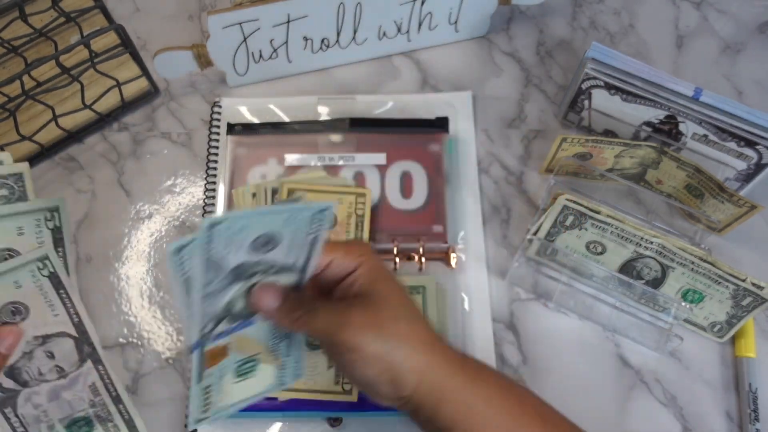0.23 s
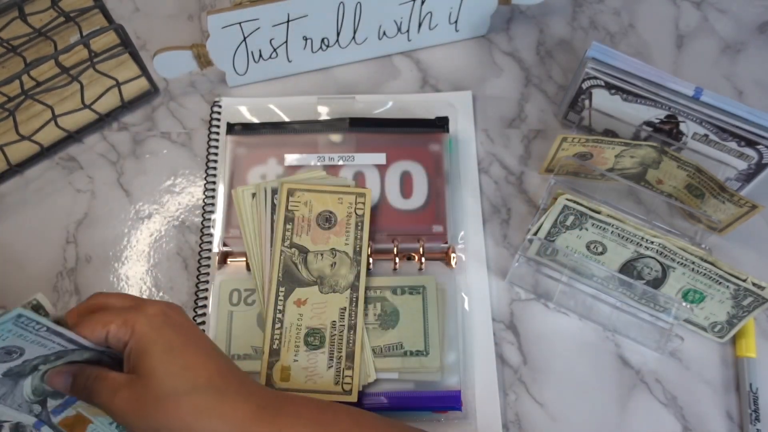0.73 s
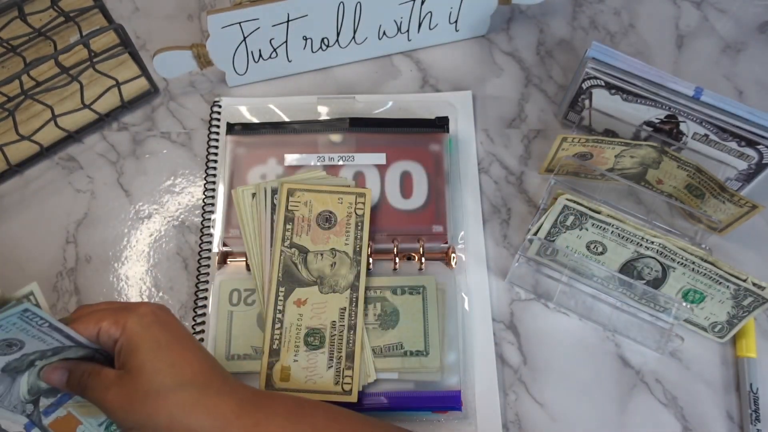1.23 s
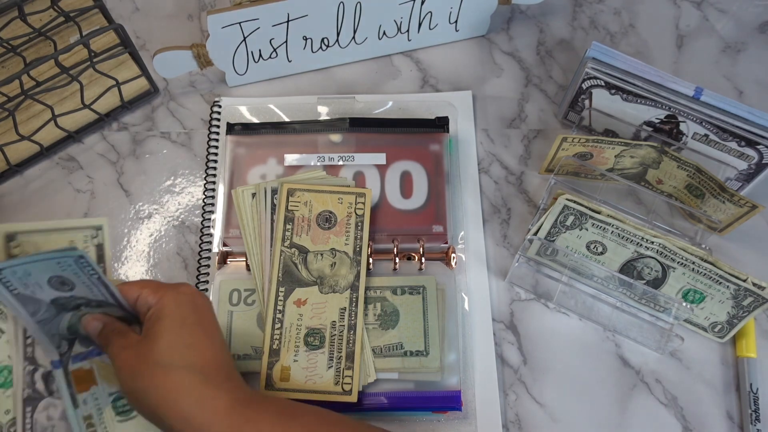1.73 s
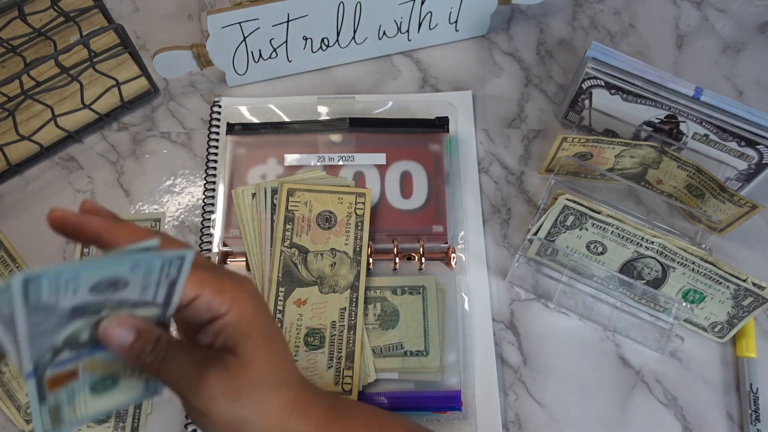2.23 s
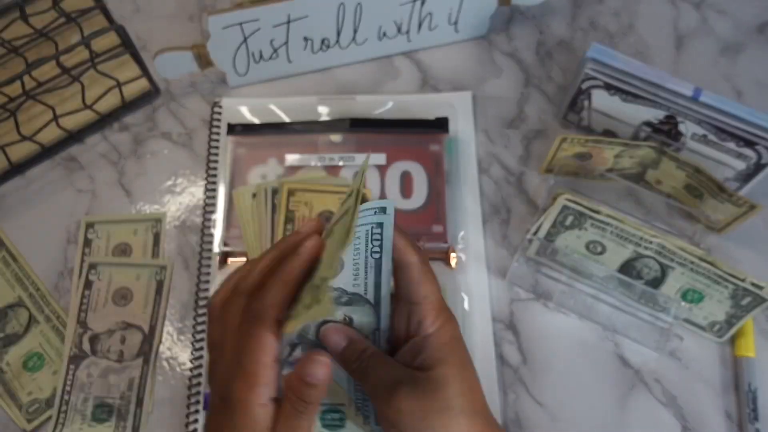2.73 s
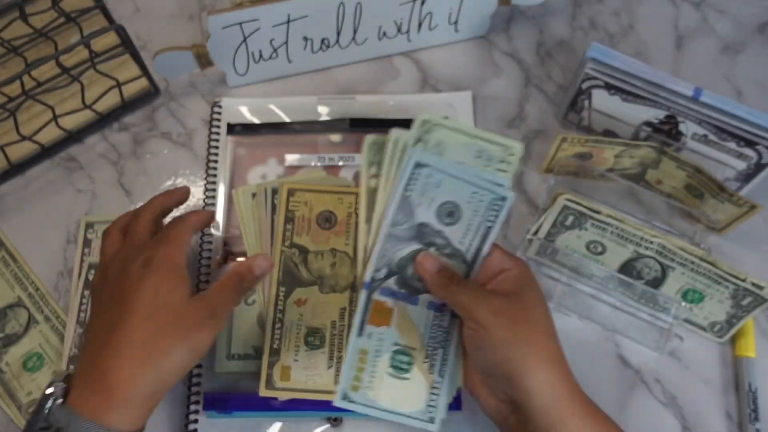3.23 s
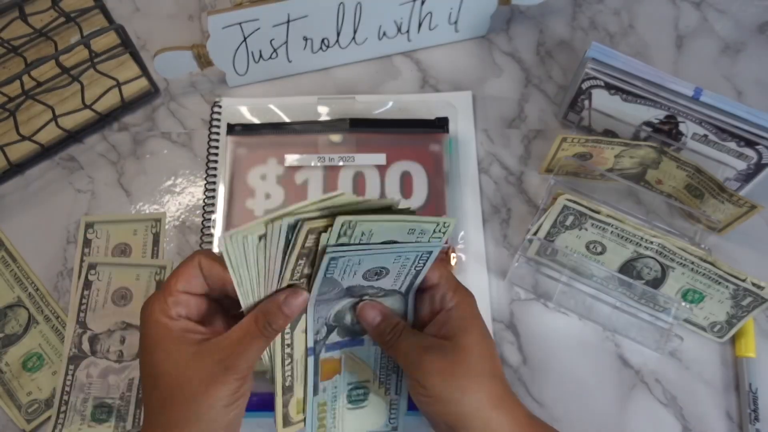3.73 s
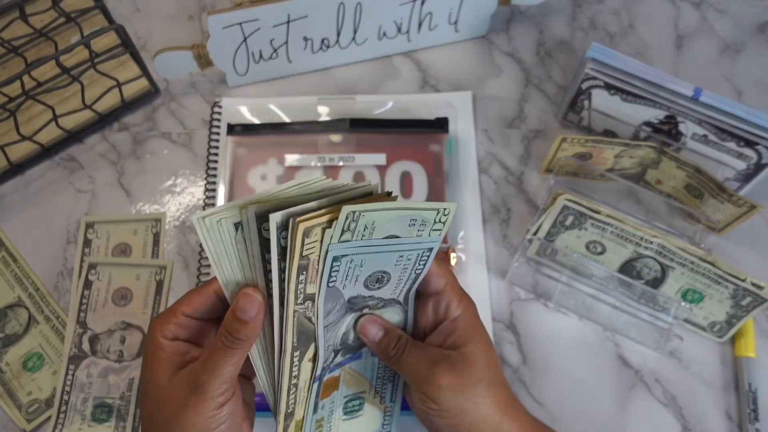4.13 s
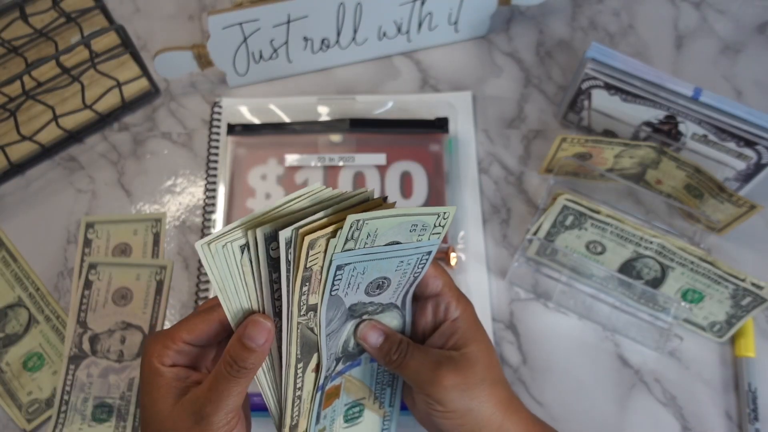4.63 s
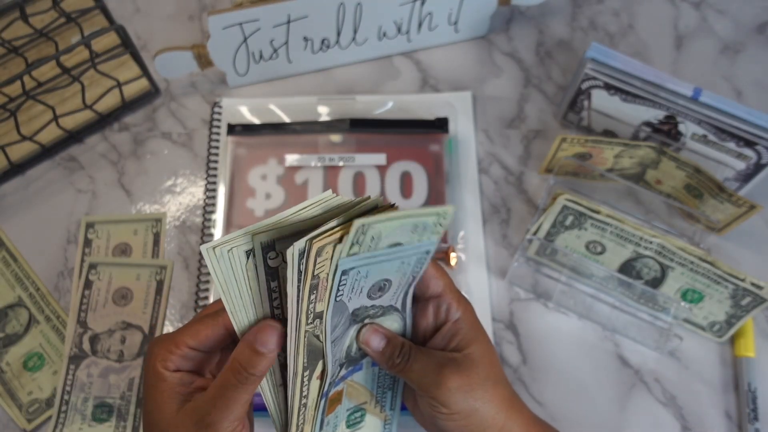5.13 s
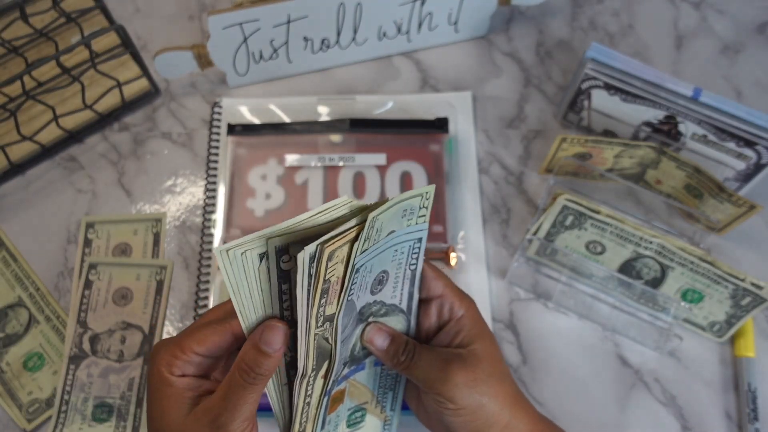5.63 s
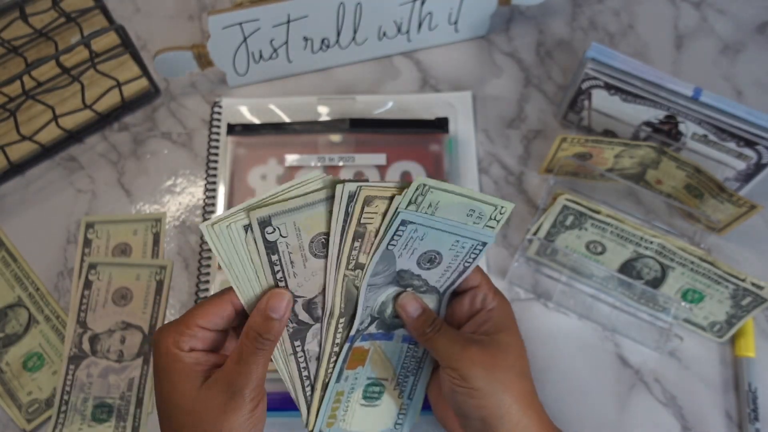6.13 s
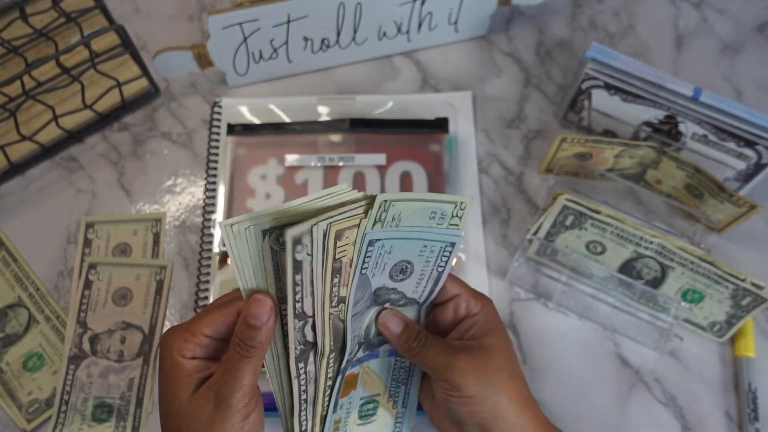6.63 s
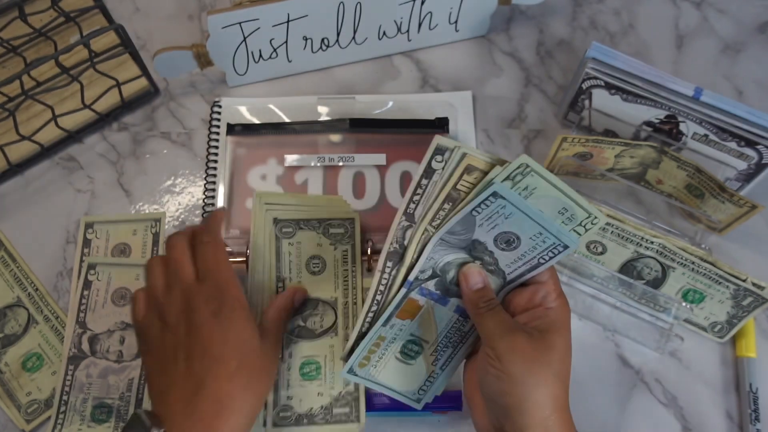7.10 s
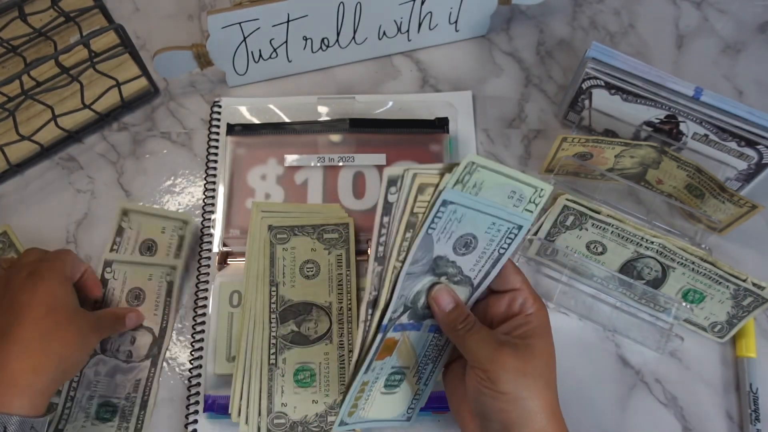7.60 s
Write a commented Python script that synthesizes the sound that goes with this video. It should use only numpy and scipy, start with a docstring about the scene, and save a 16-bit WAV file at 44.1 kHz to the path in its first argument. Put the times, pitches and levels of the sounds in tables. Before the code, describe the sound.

Stiff bills rub over one another in short strokes with crisp little pops, captured very near indoors. A sharp snap with a light tap, a loud swipe and bright clicks punctuate the first half; sparse quiet rustling follows. At the end the sheets crackle quickly, hands drag and knock on the table top, over steady low rumble and faint hiss.

```python
"""Paper notes counted and sorted by hand over a hard table, close below a small microphone, indoors.
At first sheets rasp in close-set strokes, with small snaps and a hard double snap near 1.9 s.
Sudden slips, creaks and sharp snaps follow up to 4 s; then the hands work sparser until 6.8 s.
The last second is a burst of snapping creases, quick slips and knocks on the table top.
Rasps are bands of ticking noise, snaps short sine pops with crackle; rumble and hiss lie beneath."""
import sys
import numpy as np
from scipy import signal
from scipy.fft import rfft, irfft, next_fast_len
from scipy.io import wavfile
from scipy.ndimage import uniform_filter1d

SR = 44100
rng = np.random.default_rng(int(sys.argv[2]) if len(sys.argv) > 2 else 0)


def master_out(mix):
    """Clip the mix to full scale and print it as 16-bit PCM to the path in sys.argv[1]."""
    frames = np.transpose(np.atleast_2d(mix))
    ceiling = np.clip(frames, -1, 1)
    pcm = np.round(ceiling * 32767).astype(np.int16)
    wavfile.write(sys.argv[1], SR, pcm)


def voltage_ratio(level):
    """Linear amplitude factor for a level in decibels (scalar or array-like)."""
    return 10 ** (np.asarray(level, float) / 20)


N = 346626  # samples, about 7.86 s

# Levels in the tables are those ahead of the input stage in record().
# one sheet drawn over another, nominal level with the crest 2 dB lower:
# crest_s (most effort), rasp_db, swell_ms per 10 dB, fade_ms per 10 dB, brightness_db
SHEET_STROKES = [(0, -31, 50, 63, -0.5), (.111, -39.5, 82, 146, -4), (.348, -37.5, 87, 80, 11),
                 (.438, -32, 110, 204, -4), (.593, -34.5, 72, 46, 21), (.706, -30.5, 37, 52, -5.5),
                 (0.789, -30.5, 91, 102, -0.5), (.969, -38.5, 84, 153, 2), (1.234, -42.5, 159, 58, 0),
                 (1.525, -42.5, 200, 42, -5), (1.625, -35, 50, 80, -6), (1.725, -22, 60, 59, 2),
                 (1.908, -37, 2, 47, -18), (1.992, -33.5, 135, 79, -4), (2.442, -36.5, 32, 136, -3),
                 (2.744, -19.5, 43, 51, 4), (2.79, -31.5, 40, 77, -7.5), (2.866, -27.5, 130, 18, 11),
                 (3.02, -39.5, 200, 146, 11), (3.196, -43.5, 40, 48, 6), (3.358, -36, 30, 250, -1),
                 (3.578, -38, 150, 300, 3), (3.729, -39, 100, 85, -3), (4.014, -61, 18, 60, -9),
                 (4.27, -36, 32, 55, 5), (4.513, -48.5, 130, 77, 5), (5.189, -36.5, 28, 70, 4.5),
                 (5.269, -44, 50, 75, -1), (5.853, -35, 83, 86, 2.5), (6.22, -50, 100, 100, 8),
                 (6.787, -46, 76, 300, 1), (6.902, -32, 17, 150, 31), (6.95, -33.5, 48, 31, -6.5),
                 (6.997, -35, 20, 16, 2), (7.081, -33, 56, 55, -3), (7.12, -41.5, 15, 97, -5),
                 (7.474, -38.5, 21, 95, -9), (7.555, -37, 60, 100, 2), (7.606, -23.5, 19, 77, -2),
                 (7.826, -38.5, 161, 52, 30)]
# a sheet slips free all at once and stops as suddenly, levels at mid-slip:
# start_s, length_ms, rasp_db, flex_db above rasp, fibre_db above rasp
SHEET_SLIPS = [(.203, 33, -37, -5, -3.5), (.304, 20, -34, -11, -4.5), (.345, 31, -35, -3, -10),
               (.397, 20, -31, 2, -1), (1.859, 20, -42, 11, -10), (2.391, 35, -37.5, -14, -2.5),
               (2.47, 34, -41.5, -16, 0.5), (2.7, 61, -41, -17, 8), (2.999, 28, -39.5, -4.5, 3.5),
               (3.27, 46, -42, -.6, -3), (3.339, 16, -35.5, -9, -5), (3.378, 35, -28, -10.5, -3.5),
               (3.531, 72, -32, -5, -1), (4.115, 21, -48, -9, 6), (5.258, 22, -43.5, 1, 4),
               (6.785, 49, -38.5, -11, -1.5), (6.982, 7.5, -26, 0.5, -0.5), (7.002, 12, -37.5, 6.5, 3),
               (7.044, 20, -32, -16, 0), (7.077, 21, -27, -2.5, -4), (7.435, 24, -32, -2, -9.5),
               (7.494, 39, -32, -7, 3.5), (7.559, 22, -29, -8, -7), (7.578, 21, -23, -14, 2.5),
               (7.611, 26, -28, -20, 8), (7.772, 23, -44, -6, 0), (7.839, 48, -21, -8, -2)]
# faint rustle of the held stack, levels joined by straight lines: time_s, rasp_db
HELD_STACK = [(0, -50), (1.3, -49), (2.3, -47.5), (3.3, -49), (3.9, -90), (5.4, -58), (6.7, -56.5),
              (7.3, -81), (7.86, -32)]
# paper as the microphone colours it: frequency_hz, density_db per Hz
PAPER_COLOUR = [(180, -33), (300, 2), (462, -11.5), (593, -3.5), (915, -4), (1900, -5.5), (2140, -5.5),
                (3460, -5), (3760, -0.5), (5800, -11.5), (6740, -6.5), (11700, -14), (16000, -30.5)]
# creases snapping, pop level before the cavity adds its ring:
# start_s, peak_db, pitch_hz, crackle_db above peak, crackle_t60_ms
CREASE_SNAPS = [(0.0948, -22, 2330, -5, 17), (.0957, -27, 645, -15, 12), (.1239, -26, 595, -6.5, 71),
                (0.2175, -29, 1550, 0, 12), (.264, -21, 6760, -10, 11), (.3077, -25, 1890, -2, 30),
                (.3085, -28, 800, -3, 20), (.3494, -15, 4840, -5.5, 51), (.3526, -25, 844, -5, 47),
                (.3739, -14.5, 3800, -4, 21), (.3998, -11.5, 1890, -2.3, 29), (.488, -16, 3730, -7, 33),
                (0.6616, -20, 3140, -1.5, 53), (.6635, -17.5, 800, -5, 42), (0.7014, -12, 2450, -2.5, 20),
                (1.075, -25, 2130, -15, 44), (1.5781, -18.5, 1010, -1.5, 15), (1.8225, -26, 1080, -12, 8.5),
                (1.8602, -28.5, 4440, 0.5, 32), (1.9007, -5, 1980, -7, 39), (1.9033, -7.5, 3260, -22, 30),
                (1.907, -12, 1120, -1, 55), (2.2135, -20.5, 950, -14, 98), (2.3946, -23, 3230, -11, 60),
                (2.4923, -34, 770, 0, 18), (2.7366, -3.5, 3640, -12, 85), (3.0005, -26, 6220, -8, 60),
                (3.0079, -23.5, 2670, -7, 11), (3.2866, -25, 8160, -5, 12), (3.3394, -21, 2760, -6, 100),
                (3.346, -26, 3600, -1, 12), (3.3894, -18, 1450, -9, 10), (3.4654, -30, 1120, -3, 55),
                (3.5339, -26.5, 3680, -4, 65), (3.5785, -2.5, 3420, -15, 20), (3.5792, -13, 1580, -12, 13),
                (3.731, -26, 2430, 0, 11), (3.7782, -36, 1250, -3, 14), (3.8442, -27, 3230, -26, 60),
                (3.8523, -30, 3700, -2, 26), (4.1384, -33.5, 1700, -1, 18), (4.333, -30.5, 700, -1.5, 22),
                (4.3336, -33, 1730, 0, 13), (4.7783, -34, 1730, -7, 50), (5.2672, -20, 3700, -10, 22),
                (5.2685, -19, 6300, -8, 10), (6.1429, -32.5, 1840, -5, 34), (6.9825, -22, 2060, -3, 52),
                (7.0047, -27, 1510, 8, 16), (7.0464, -22, 1730, 1, 64), (7.0861, -16, 3980, -1, 8.7),
                (7.0916, -21.5, 910, 4, 11), (7.1802, -31, 3980, 2, 13), (7.4308, -21.5, 4600, -0.5, 68),
                (7.435, -5.5, 3620, -17, 25), (7.4375, -21, 3470, 2, 14), (7.5167, -8.5, 6460, -13, 55),
                (7.547, -23, 3500, -6, 12), (7.5627, -23, 2390, 4.5, 23), (7.5804, -6.5, 4040, -3.5, 34),
                (7.5866, -10, 4300, -14, 60), (7.6214, 0.5, 4180, -44, 60), (7.628, -14, 3320, 6, 6.4),
                (7.669, -25.5, 2110, 2, 19), (7.7738, -9.5, 7100, -12.5, 51),
                (7.7802, -13.5, 4300, -15, 69), (7.8447, -9.5, 3240, -2, 76)]
# bending sheets singing through a gliding resonance, rms before the swell:
# start_s, length_ms, from_hz, to_hz, level_db
SHEET_CREAKS = [(.368, 15, 3700, 3860, -25), (2.74, 60, 2500, 2300, -29), (3.276, 31, 2500, 1980, -38),
                (3.361, 39, 2300, 3320, -26), (3.6, 60, 3620, 3900, -41), (6.79, 32, 4300, 4100, -36),
                (.352, 23, 800, 926, -33)]
# knocks on the table: start_s, peak_db, contact_ms (width of the push at half height)
TABLE_KNOCKS = [(.125, -22, 0.36), (1.9016, -13.5, 0.4), (7.1, -21.5, 1.2), (7.4339, -2.5, 0.38),
                (7.604, -6, 0.79), (7.673, -16.5, 2.8)]
# modes of the table top: pitch_hz, level_db (relative), t60_s
TABLE_MODES = [(159, -16, 0.087), (179.3, -6, 0.29), (292, 2, 0.24), (340, -7, 0.06), (402, -11, 0.22),
               (472, 0, 0.082), (516, -2, 0.086), (645, -1.5, 0.05), (800, -8, 0.045), (985, -1, 0.038),
               (1130, -6, 0.056)]
# hand dragging over the table, levels joined by straight lines: time_s, level_db
HAND_DRAG = [(7.433, -60), (7.438, -28), (7.47, -21.5), (7.52, -25), (7.59, -43), (7.61, -24.5),
             (7.68, -46), (7.776, -27), (7.86, -44)]
# dull low thumps, an arm leaning on the table frame: start_s, peak_db (nominal), pitch_hz, t60_s
ARM_THUMPS = [(.675, -28, 94.1, 0.98), (2.636, -23, 105.3, 0.61), (3.3, -30.5, 103.5, 0.64),
              (6.921, -28.5, 101.3, 0.9), (7.431, -21, 108, 0.29)]
# shape of the room rumble and hiss: frequency_hz, density_db per Hz (relative)
AIR_COLOUR = [(9.4, -5.5), (16, 5), (30, -3), (140, -20.5), (171, -23.5), (314, -30), (353, -31.5),
              (499, -33.5), (593, -38), (969, -40), (1290, -46), (1630, -45), (3260, -48), (4490, -40),
              (16000, -60.5)]

# flex and fibre hiss of a plain stroke, dB above its rasp
FLEX_DB, FIBRE_DB = -6, -4.5


def slide():
    """Fibres catch and let go: ticks over smooth friction, in a grip that comes and goes."""
    flex_top_hz, rasp_top_hz = 2300, 5490
    # large wrinkles tick low and seldom, single fibres high and densely: low_hz, high_hz, ticks per s
    bands = [
        (350, flex_top_hz, 400),
        (flex_top_hz, rasp_top_hz, 1200),
        (rasp_top_hz, 17000, 5000),
    ]
    sheets = 0
    grip_db = 1.5 * walk(70)
    for (low_hz, high_hz, per_s), gain in zip(bands, effort()):
        friction = ticks(per_s, spread_db=1.0, top_db=3.0) + rng.standard_normal(N)
        rub = colour(friction, PAPER_COLOUR)
        # as the sheets bend, their resonances come and go: each slice of the band wanders alone
        edges = np.geomspace(low_hz, high_hz, num=5)
        patchy = sum(band(rub, low, high) * voltage_ratio(1.37 * walk(50)) for low, high in zip(edges, edges[1:]))
        sheets = sheets + unit(patchy) * gain * voltage_ratio(grip_db)
    return sheets


def effort():
    """Gains of flex, rasp and fibre hiss: held stack, strokes and sudden slips add in power."""
    t = np.arange(N) / SR
    held_db = np.interp(t, *np.transpose(HELD_STACK))
    power = np.outer(voltage_ratio(2 * np.array([FLEX_DB, 0, FIBRE_DB])), voltage_ratio(2 * held_db))
    add_strokes(power, t)
    add_slips(power, t)
    return np.sqrt(power)


def add_strokes(power, t):
    """A stroke swells and fades at its own steady dB rates, over a rounded crest."""
    fibre_share = 0.14  # brightness is taken from the flex and this share of it given to the fibres
    for crest_s, rasp_db, swell_ms, fade_ms, bright_db in SHEET_STROKES:
        span = slice(max(int((crest_s - 1) * SR), 0), int((crest_s + 1) * SR))
        ms = 1000 * (t[span] - crest_s)
        slope_db = 10 * np.where(ms < 0, ms / swell_ms, ms / fade_ms)
        # rounded over the top few dB; the crest itself lies 2 dB below nominal
        below_db = np.hypot(slope_db, 1) + 1
        bands_db = rasp_db + np.array([FLEX_DB - bright_db, 0, FIBRE_DB + fibre_share * bright_db])
        power[:, span] += np.outer(voltage_ratio(2 * bands_db), voltage_ratio(-2 * below_db))


def add_slips(power, t):
    """A slip starts and stops abruptly; the shorter it is, the more it fades from start to end."""
    edge_ms = 1.1
    for s, length_ms, rasp_db, flex_db, fibre_db in SHEET_SLIPS:
        span = slice(int(s * SR), int((s + length_ms / 1000) * SR) + 1)
        ms = np.clip(1000 * (t[span] - s), 0, length_ms)
        fade_db = 8 * 19.4 / length_ms  # 8 dB over a slip of 19.4 ms
        gate = np.clip(np.minimum(ms, length_ms - ms) / edge_ms, 0, 1)
        fade = voltage_ratio(-2 * fade_db * (ms / length_ms - .5))
        bands_db = rasp_db + np.array([flex_db, 0, fibre_db])
        power[:, span] += np.outer(voltage_ratio(2 * bands_db), gate * fade)


def snaps():
    """A crease pops at its own pitch for a few cycles, then crackles as the sheet settles."""
    pops, crackles, t = np.zeros(N), np.zeros(N), np.arange(6000) / SR
    rows = small_creases(count=70) + CREASE_SNAPS
    noises = rng.standard_normal((len(rows), 6000))
    for (s, db, hz, crackle_db, t60_ms), noise in zip(rows, noises):
        turns = t * hz
        cycles = max(7 + .08 * db, 1)  # cycles to fall 40 dB: 7 at full scale, fewer when softer
        rise = 1 - np.exp(-turns / 0.97)
        pop = np.sin(2 * np.pi * turns) * np.exp(-np.log(100) * turns / cycles) * rise
        # bigger creases, lower pitch: the crackle falls away 7 dB per octave above it, 5 dB below
        lean = [(f, d - abs(np.log2(f / hz)) * (7 if f > hz else 5)) for f, d in PAPER_COLOUR]
        crackle = unit(colour(noise, lean)) * np.exp(-np.log(1000) * t * 1000 / max(t60_ms, 4))
        add(pops, s, voltage_ratio(db) * pop / np.abs(pop).max())
        add(crackles, s, voltage_ratio(db + crackle_db) * crackle)
    return pops + port(pops) + crackles


def small_creases(count):
    """Rows like CREASE_SNAPS at chance moments, as loud as the sheets are moving."""
    low_hz, high_hz = 750, 2500
    above_rasp_db, crackle_db, t60_ms = 7, -6.5, 31
    when, pitch = rng.random((count, 2)).T
    rasp = effort()[1]
    db = 20 * np.log10(rasp[(when * N).astype(int)]) + above_rasp_db
    hz = low_hz * (high_hz / low_hz) ** pitch
    return [(s, d, f, crackle_db, t60_ms) for s, d, f in zip(when * N / SR, db, hz)]


def port(pops):
    """The cavity in front of the microphone is a broad resonance, rung by every pop."""
    centre_hz, width_hz, level_db = 3700, 1500, -9.5
    return voltage_ratio(level_db) * signal.lfilter(*signal.iirpeak(centre_hz, centre_hz / width_hz, SR), pops)


def creaks():
    """A bending sheet sings: narrow noise on a gliding centre, swelling and fading."""
    width_hz = 350
    out = np.zeros(N)
    noises = rng.standard_normal((len(SHEET_CREAKS), 2, 4000))
    for (s, length_ms, from_hz, to_hz, db), noise in zip(SHEET_CREAKS, noises):
        size = min(int(length_ms * SR / 1000), 4000)
        slow = signal.lfilter(*signal.butter(2, width_hz / 2, fs=SR), noise)
        a, b = slow[:, -size:]
        phase = 2 * np.pi * np.cumsum(np.linspace(from_hz, to_hz, size)) / SR
        tone = unit(a * np.cos(phase) + b * np.sin(phase))
        add(out, s, voltage_ratio(db) * np.sqrt(np.hanning(size)) * tone)
    return out


def table():
    """Knocks push the table modes, longer contacts only the low ones; a dragging hand judders the top."""
    t = np.arange(SR // 2) / SR
    ring = sum(voltage_ratio(db) * np.sin(2 * np.pi * hz * t) * np.exp(-np.log(1000) * t / t60)
               for hz, db, t60 in TABLE_MODES)
    return knocks(ring) + drag(ring, t)


def knocks(ring):
    """Each knock is a smooth raised-cosine push into the ringing top."""
    out = np.zeros(N)
    for s, db, contact_ms in TABLE_KNOCKS:
        push = np.hanning(int(2 * contact_ms * SR / 1000) + 3)
        blow = signal.fftconvolve(ring, push)
        add(out, s, voltage_ratio(db) * blow / np.abs(blow).max())
    return out


def drag(ring, t):
    """Skin sticks and slips in dense ticks, and damps the ring of the top it lies on."""
    judder = band(ticks(2000, spread_db=0.5, top_db=7), 233, 1180)
    damped = ring * np.exp(-t / 0.0034)
    judder = unit(signal.fftconvolve(judder, damped)[:N])
    s, db = np.transpose(HAND_DRAG)
    return judder * voltage_ratio(np.interp(np.arange(N) / SR, s, db, left=-99))


def thumps():
    """The leaned-on frame gives one soft low ring each time, swelling over its first cycle."""
    out, t = np.zeros(N), np.arange(SR) / SR
    for s, db, hz, t60 in ARM_THUMPS:
        swell = 1 - np.exp(-t * hz * 3)
        decay = np.exp(-np.log(1000) * t / t60)
        add(out, s, voltage_ratio(db) * np.sin(2 * np.pi * hz * t) * decay * swell)
    return out


def room(x):
    """Short diffuse tail of a furnished room: decaying noise, starting with the first walls."""
    t60_s, level_db = 0.27, -17
    t = np.arange(SR // 2) / SR
    diffuse = band(rng.standard_normal(len(t)), 170, 8600)
    tail = diffuse * np.exp(-np.log(1000) * t / t60_s) * (t > .004)
    return voltage_ratio(level_db) * signal.fftconvolve(x, tail / np.sqrt(np.sum(tail ** 2)))[:N]


def air():
    """Steady rumble and hiss: coloured noise that swells a little around -25 dB."""
    level_db = -25 + 0.45 * walk(2.63)
    return voltage_ratio(level_db) * unit(colour(rng.standard_normal(N), AIR_COLOUR))


def ticks(per_s, spread_db, top_db):
    """Sparse impulses of uneven but bounded size, at rms 1."""
    size_db = np.minimum(spread_db * rng.exponential(size=N), top_db)
    return unit((rng.random(N) < per_s / SR) * voltage_ratio(size_db) * rng.standard_normal(N))


def walk(rate):
    """Random levels held 1 / rate s and slewed twice; spread near 1."""
    k = int(SR / rate)
    held = np.repeat(rng.standard_normal(N // k + 1), k)
    return 1.26 * uniform_filter1d(uniform_filter1d(held, k), k)[:N]


def colour(x, points):
    """Filter by (Hz, dB) points joined on a log axis."""
    hz, db = np.transpose(points)
    size = next_fast_len(len(x))
    f = np.arange(size // 2 + 1) * SR / size
    gain = voltage_ratio(np.interp(np.log(f + 1), np.log(hz), db))
    return irfft(rfft(x, size) * gain, size)[:len(x)]


def band(x, low_hz, high_hz):
    """Steep band-pass."""
    edges = [low_hz, min(high_hz, .45 * SR)]
    return signal.sosfilt(signal.butter(3, edges, "bandpass", fs=SR, output="sos"), x)


def unit(x):
    """Scale to rms 1."""
    return x / np.sqrt(np.mean(x ** 2))


def add(out, s, sound):
    """Mix a sound in at time s."""
    i = int(s * SR)
    out[i:i + len(sound)] += sound[:N - i]


def scene():
    """Snaps, creaks and table sounds ring the room; thumps, sliding sheets and air join them dry."""
    hits = snaps() + creaks() + table()
    return (hits + room(hits) + thumps() + slide() + air())[None]


def low_pass(x):
    """Removes everything above the highest recorded frequency."""
    return signal.sosfilt(signal.butter(12, 16450, fs=SR, output="sos"), x)


def record(dry):
    """The microphone's input stage rounds the loudest peaks."""
    mix = np.tanh(0.76 * dry) / 0.84
    return low_pass(mix)


dry = scene()
out = record(dry)
master_out(out)
```